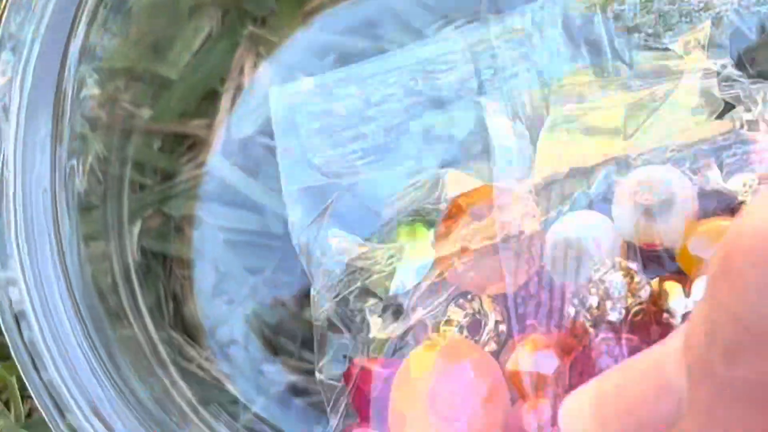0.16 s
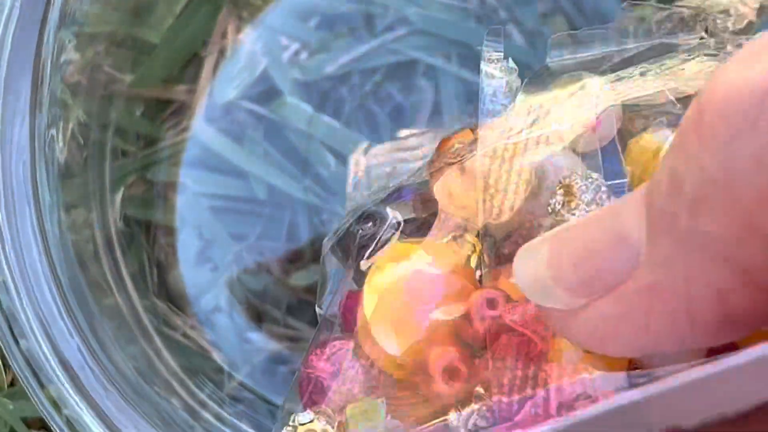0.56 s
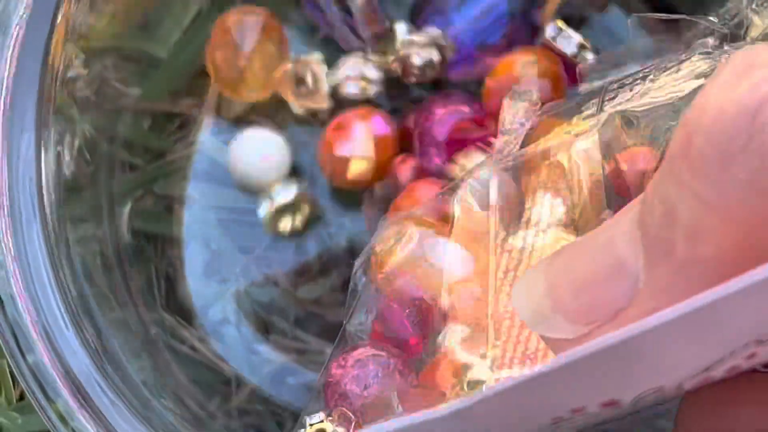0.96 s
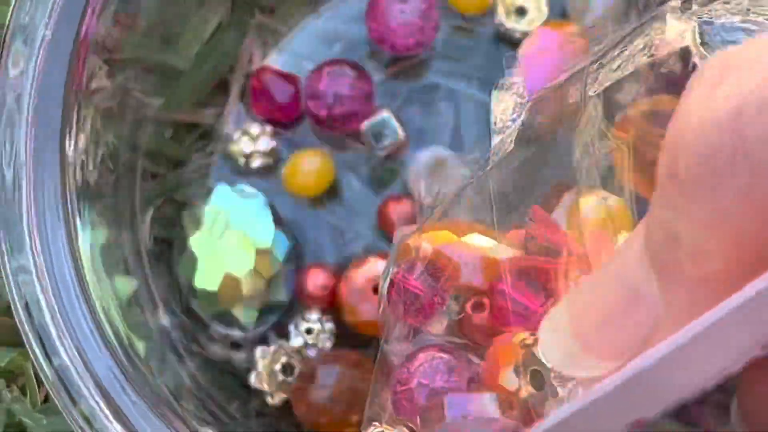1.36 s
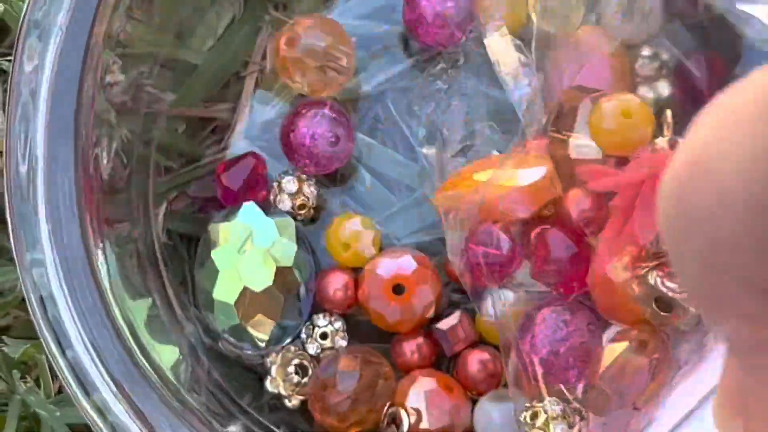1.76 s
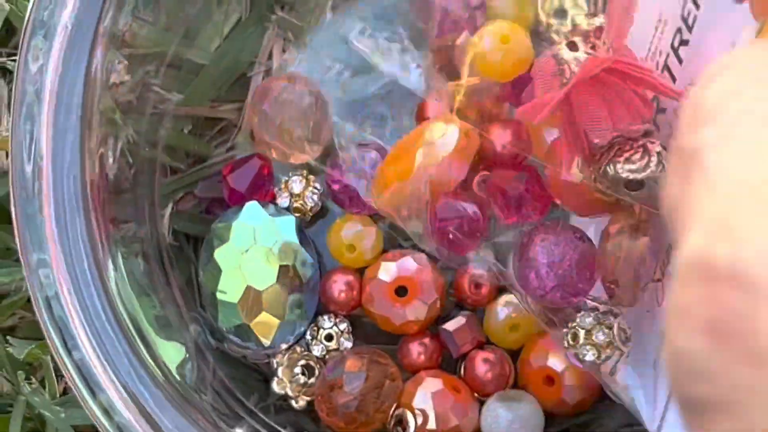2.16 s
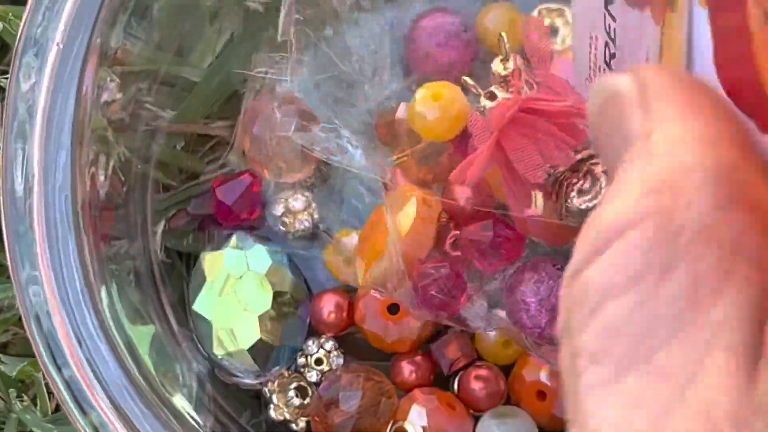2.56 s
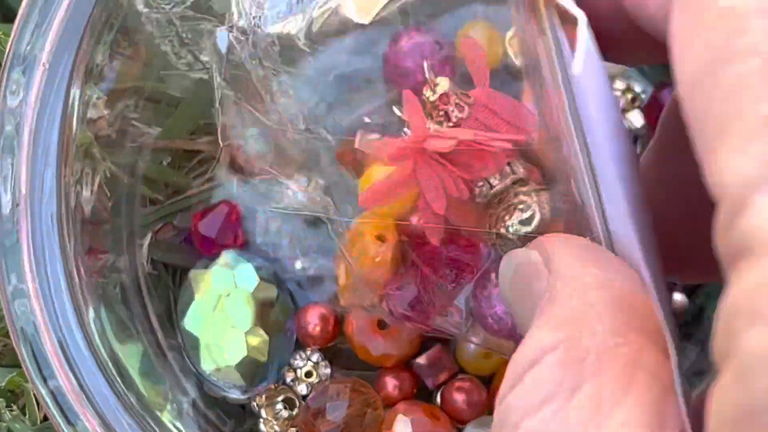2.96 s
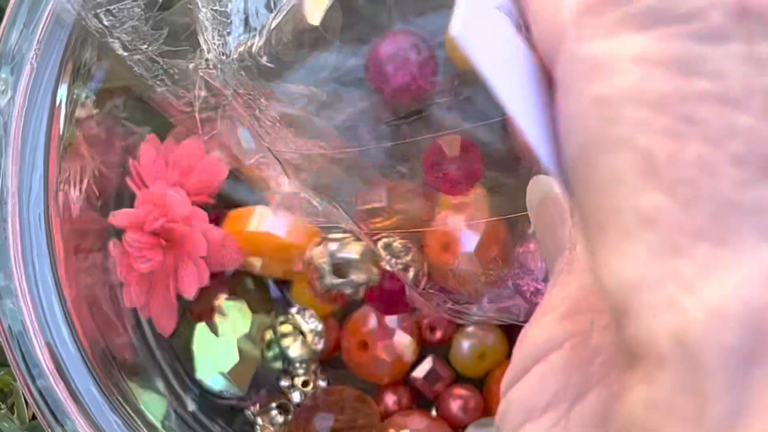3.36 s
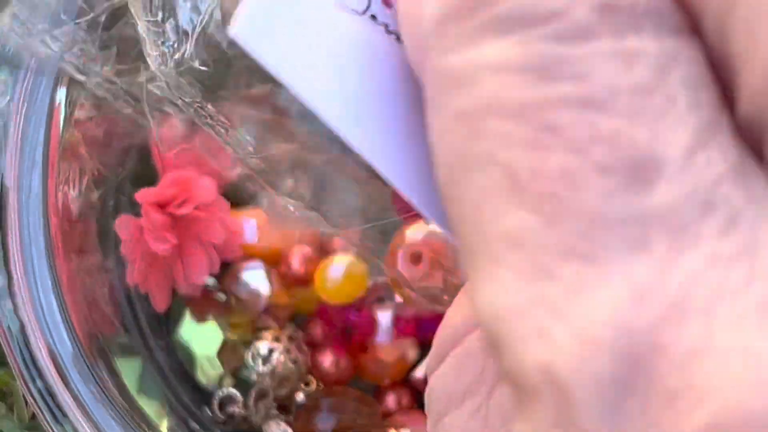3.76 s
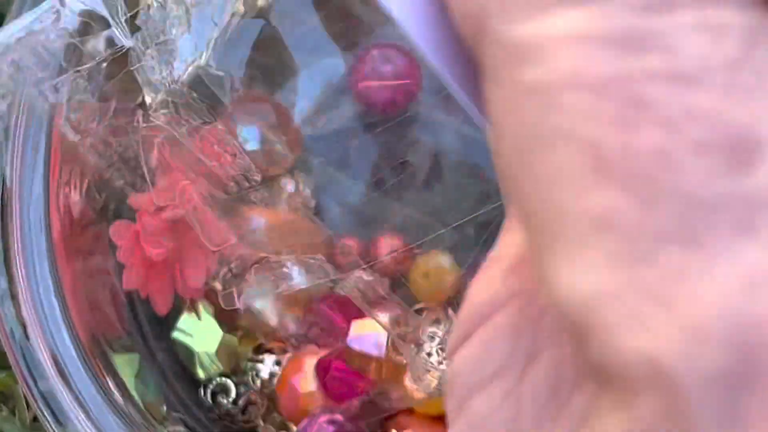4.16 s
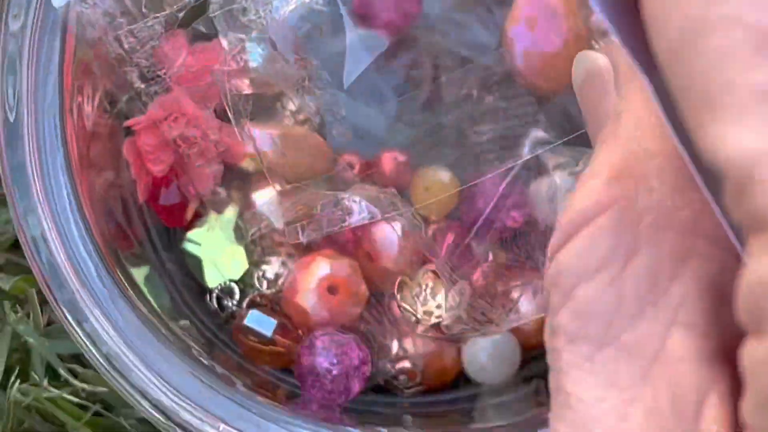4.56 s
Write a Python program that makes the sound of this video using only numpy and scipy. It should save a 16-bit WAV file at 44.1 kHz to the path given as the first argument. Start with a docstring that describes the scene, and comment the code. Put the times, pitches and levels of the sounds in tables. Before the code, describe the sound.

Small glass and metal beads spill from a crinkling plastic bag into a clear bowl, clattering and jingling brightly, then thinning to sparse ticks and a second smaller tumble.

```python
"""Beads poured from a bag into a bowl

Glass and metal beads slide out of a plastic bag into a bowl standing on grass.
Small metal beads and a larger metal ring chime as decaying modes; knocks on the bowl and snaps of the bag
excite broad resonances; random small contacts rustle and jingle; distant traffic rumbles as shaped noise.
Two microphone ports a little apart hear everything in shifted phase."""
import sys
import numpy as np
from scipy import signal
from scipy.fft import rfft, irfft, next_fast_len
from scipy.io import wavfile

SR = 44100
rng = np.random.default_rng(int(sys.argv[2]) if len(sys.argv) > 2 else 0)


def wav_out(sig):
    """Save sig, one row per channel (or a flat mono array), as 16-bit PCM at SR to the path in sys.argv[1]."""
    wavfile.write(sys.argv[1], SR, np.round(np.clip(np.atleast_2d(sig).T, -1, 1) * 32767).astype(np.int16))


def how_loud(loudness_db):
    """Turn decibels into a plain amplitude multiplier (0 dB gives 1, 20 dB gives 10)."""
    steps = np.asarray(loudness_db, float) / 20
    return 10 ** steps


N = 208433  # samples

# Far rumble and hiss, relative spectrum: frequency_hz, level_db (per hertz)
AIR_SPECTRUM = [(15, -34.5), (31, -17.5), (55, 0), (120, -4.5), (150, -12), (235, -12.5), (310, -21.5),
                (750, -32.5), (2050, -34), (3100, -44.5), (5700, -40), (7400, -49.5), (9000, -72.5),
                (12500, -57.5), (16000, -73)]
# Likeness of the air noise at the two ports: frequency_hz, likeness (0 to 1)
AIR_LIKENESS = [(40, .997), (100, .99), (300, .85), (700, .45), (1300, .1), (2200, .92), (4000, .99),
                (7000, .75), (16000, .9)]
# Phase by which the left port leads: frequency_hz, lead_rad
PORT_PHASE = [(0, 0), (300, 0), (450, .2), (1100, .15), (1300, .8), (1400, 2.6), (1520, 3.1), (1650, 3.6),
              (1740, 6.28), (4200, 6.28), (4400, 6.1), (5170, 6.05), (5600, 5.3), (6720, 5.5), (7670, 3.6),
              (8870, 2.9), (10700, .6), (12600, -.2), (14000, -1.8), (14700, -3.1), (17000, -3.1)]
# Level of the left port over the right: frequency_hz, difference_db
PORT_BALANCE = [(180, 0), (450, 3), (1050, 4), (1380, 10), (1550, 0), (1720, -2.6), (2050, -.5),
                (2350, -1.5), (2700, 0)]
# Range in which the echo is filtered out, so that both ports hear nearly the same sound: from_hz, to_hz
ALIKE_HZ = [2600, 5000]

# Stirring of bag and beads, as the level of the dull rustle: time_s, level_db
STIR = [(.04,-76),(.088,-47.5),(.2,-88.5),(.34,-53),(.44,-66.5),(.62,-53),(.82,-38),(.95,-28.5),(1.43,-40),(1.62,-51),(1.94,-52),(2.06,-68),(2.23,-48.5),(2.37,-73),(2.62,-56),(2.7,-64.5),(2.85,-49),(2.95,-58),(3.12,-49),(3.15,-47),(3.3,-45),(3.5,-44),(3.54,-45),(3.57,-56),(3.62,-57),(3.77,-51.5),(3.84,-57.5),(3.96,-41.5),(4.17,-43),(4.22,-40),(4.32,-52),(4.45,-61),(4.72,-103)]
# Level of the small beads jingling loose in the bowl: time_s, level_db
JINGLE = [(.72,-95),(.78,-68),(.89,-25.5),(1.03,-22),(1.1,-15.5),(1.43,-24),(1.49,-32),(1.76,-36.5),(1.9,-51.5),(2.03,-86),(3.15,-68),(3.3,-39),(3.45,-36.5),(3.6,-75),(3.77,-38.5),(3.96,-74),(4.09,-68),(4.18,-74),(4.27,-36.5),(4.45,-95)]
# Spans in which the ring lies loose among the beads: start_s, end_s
RING_LOOSE = [(.845, 1.45), (3.36, 3.9), (4.075, 4.1)]
# Resonances of the bowl: centre_hz, width_hz, level_db
BOWL_RESONANCES = [(593, 740, -15), (1206, 303, 3), (1613, 257, 0), (2020, 660, -7), (2420, 1400, -30)]
# Resonances of the bright rustle: centre_hz, width_hz, level_db
RUSTLE_RESONANCES = [(4730, 2100, 1.5), (6200, 3300, 1), (7800, 1400, 2), (11800, 6000, -10),
                     (14800, 1300, -6.5)]

# Snaps of the creasing bag: start_s (the snap sounds about 1 ms later), level_db,
# brightness_db (added to all resonances but the lowest)
SNAPS = [(0.075, -40.5, 1), (0.08, -43.5, 2), (0.095, -35, -1), (0.1153, -29.5, -7), (0.2715, -30.5, -6.5),
         (0.291, -37, -22), (0.313, -40, -2), (0.334, -45.5, 1), (0.539, -42.5, 0), (0.683, -30, -6),
         (0.7134, -33, 5), (0.7461, -31.5, -5), (0.8123, -35.5, -20.5), (0.966, -27.5, -11.5),
         (0.9765, -25, -14), (1.3415, -22.5, -2), (1.393, -42, -6), (1.425, -22.5, -4), (1.4363, -19.5, 2),
         (1.9326, -31.5, -6), (2.1747, -48.5, 15.5), (2.2366, -30, -10), (2.2493, -34, -1),
         (2.7711, -37, -13), (2.792, -24, -23), (2.8005, -33.5, -15), (2.82, -25, -5.5), (2.837, -21.5, 2),
         (3.0036, -33.5, 5), (3.0222, -30.5, 2), (3.056, -31.5, 2), (3.078, -38, 2.5), (3.136, -36, 0),
         (3.142, -35, 2), (3.144, -24, -3), (3.1549, -35, -1.5), (3.166, -29, -9), (3.2245, -27.5, -4),
         (3.247, -37, 7), (3.378, -34.5, 1.5), (3.394, -34.5, -0.5), (3.443, -24.5, -11.5),
         (3.4521, -24, -11), (3.486, -32.5, -3.5), (3.518, -42, -2), (3.534, -33, 5), (3.914, -50.5, -2),
         (3.9887, -27, -12)]
# Resonances of a snap: centre_hz, width_hz, level_db
SNAP_RESONANCES = [(1730, 610, 16), (3720, 920, 4.5), (4870, 1300, 11), (6200, 4100, -22)]

# Knocks on the bowl: start_s, thud_db, crack_db (both relative to a common gain for each part)
KNOCKS = [(0.1156, -27, -50), (0.482, -50, -35), (0.6186, -34, -40.5), (0.6864, -35, -34.5),
          (0.7471, -21, -27), (0.768, -34, -37), (0.7863, -7, -14.5), (0.805, -37, -29), (0.8276, -15, -43),
          (0.8463, -34, -15), (0.8534, -31, -14), (0.875, -3, -10), (0.895, -1.5, -12), (0.9216, -2, -19.5),
          (0.9257, -7, -20), (0.9567, -15, -29), (0.9695, -10, -10), (0.9791, -15, -20.5), (0.991, -9, -18),
          (1.0063, -16, -19.5), (1.0147, -7, -18.5), (1.0218, -19, -22), (1.0337, -16, -17),
          (1.0393, -15, -19), (1.0666, -34, -21), (1.0883, -10.5, -26), (1.099, -8, -18.5),
          (1.1105, -14.5, -23), (1.1215, -10.5, -33.5), (1.1332, -27.5, -20.5), (1.1449, -29, -20),
          (1.1531, -15.5, -27), (1.1611, -19, -18.5), (1.1709, -19, -29), (1.1795, -17, -22),
          (1.196, -20, -21), (1.1994, -19, -18), (1.207, -18, -27.5), (1.2174, -12, -27.5),
          (1.2307, -19, -22), (1.2345, -20, -15.5), (1.2504, -17, -25), (1.2686, -18, -22.5),
          (1.2721, -17.5, -20), (1.2962, -15.5, -17.5), (1.3047, -14, -24), (1.3154, -16, -24),
          (1.3288, -17.5, -17.5), (1.348, -14.5, -26), (1.3677, -14, -18), (1.4084, -20, -26.5),
          (1.4247, -6, -31), (1.467, -22.5, -41.5), (1.5303, -20, -25), (1.537, -15.5, -19),
          (1.5462, -24.5, -28.5), (1.5519, -11, -30), (1.5611, -29, -21.5), (1.5962, -16, -31),
          (1.625, -35, -38), (1.6318, -23, -27.5), (1.6468, -18.5, -27.5), (1.6634, -17.5, -29),
          (1.687, -26, -34.5), (1.6977, -17, -24.5), (1.7231, -21.5, -26), (1.7408, -23, -29),
          (1.7517, -30, -43.5), (1.7612, -28, -45), (1.771, -35, -45), (1.7784, -42, -55),
          (1.8509, -34, -31.5), (1.8559, -36, -47), (1.925, -21, -37.5), (1.9855, -29, -39),
          (1.9908, -32.5, -36), (2.0032, -27, -40), (2.1478, -34.5, -59), (2.171, -20, -32),
          (2.2136, -28, -51), (2.2573, -31, -38), (2.556, -45, -37.5), (2.5626, -40, -31),
          (2.6284, -38, -37.5), (2.6337, -37, -41.5), (2.711, -46, -38), (2.7263, -27.5, -49),
          (2.8537, -22.5, -37.5), (2.9373, -41, -63), (3.0171, -12, -31), (3.0262, -19, -46),
          (3.0579, -21, -40), (3.083, -20, -31), (3.099, -36, -44), (3.1424, -30, -20.5),
          (3.1585, -16, -39), (3.1697, -26, -29), (3.2009, -35, -44), (3.2546, -44, -28),
          (3.3043, -33.5, -27.5), (3.3254, -37.5, -26.5), (3.3419, -32, -24.5), (3.348, -26, -19.5),
          (3.3568, -34, -26), (3.3724, -30, -26.5), (3.3784, -34.5, -23.5), (3.4264, -33.5, -29.5),
          (3.4358, -26, -14), (3.4473, -29, -22), (3.454, -37.5, -19.5), (3.4613, -42, -20),
          (3.475, -43, -22.5), (3.4859, -18, -19.5), (3.4997, -36.5, -20.5), (3.5402, -33, -23.5),
          (3.5464, -38, -36), (3.6218, -48.5, -34.5), (3.643, -39, -41), (3.671, -41.5, -30.5),
          (3.6778, -40, -31), (3.7107, -44, -37.5), (3.7487, -41.5, -35), (3.7618, -29, -23),
          (3.7711, -23.5, -24.5), (3.778, -34, -31), (3.7875, -35, -28), (3.8219, -36.5, -33.5),
          (3.8284, -35, -32.5), (3.8482, -31, -34.5), (3.8673, -28, -25.5), (3.8996, -42, -29.5),
          (3.931, -41, -29.5), (3.9645, -26.5, -27), (3.975, -30.5, -36.5), (4.0192, -15.5, -25.5),
          (4.0752, -17, -9.5), (4.0838, -30, -27), (4.0922, -25.5, -40), (4.1246, -19.5, -37),
          (4.1408, -25, -25), (4.1536, -18.5, -20.5), (4.1838, -28, -19), (4.2098, -27, -31),
          (4.222, -41, -30.5), (4.2307, -33, -24), (4.263, -43, -27), (4.272, -45, -23.5),
          (4.3354, -24, -18.5), (4.3764, -32, -38.5), (4.475, -37.5, -36.5), (4.578, -51, -49),
          (4.589, -53, -48), (4.688, -31.5, -63)]
# Resonances of a crack: centre_hz, width_hz, level_db
CRACK_RESONANCES = [(4990, 1430, 1.5), (5670, 3340, 2), (8870, 3100, -0.5), (11500, 2400, -1),
                    (16000, 13000, -4.5)]

# Blows on the larger ring: start_s, level_db
RING_BLOWS = [(0.8468,-12),(0.939,-20),(0.9995,-22.5),(1.056,-17),(1.067,-23),(1.081,-25),(1.099,-22),(1.122,-26),(1.194,-28),(1.24,-30),(1.2685,-32),(1.3217,-29.5),(1.345,-44),(1.3657,-26),(1.409,-36),(1.55,-33),(1.579,-36),(4.074,-8),(4.102,-15.5),(4.1395,-30),(4.1852,-12),(4.22,-16.5),(4.241,-24),(4.2582,-23.5),(4.268,-22.5),(4.282,-24),(4.339,-19),(4.35,-19.5),(4.3811,-26),(4.413,-35.5)]
# Frequencies of the ring modes: pitch_hz
RING_HZ = [5613, 2375, 9951, 15615, 15735]
# Ring modes: struck_db, t60_s (undamped), loss (dB per dB that a blow is softer than a hard one), jingle_db
RING_MODES = [(3, 0.059, 0, 3), (-14.5, 0.12, 2, -6.5), (-6.5, 0.056, 0.95, -12), (-6.5, 0.03, 4.5, -2),
              (-10.5, 0.03, 1, -1)]

# Blows on the small metal beads: start_s, lowest_mode_db, upper_modes_db
BEAD_BLOWS = [(.786,-9.5,-18.5),(.8271,-14,-18),(0.876,-7.5,-22),(.895,-11.5,-13.5),(0.9063,-13,-20),(.9217,-14,-21),(.966,-18.5,-21),(.9815,-4,-25),(1.0148,-14.5,-28),(1.0335,-23.5,-17.5),(1.053,-17,-22),(1.073,-16.5,-23),(1.1,-22,-17),(1.1075,-22,-14),(1.1432,-24,-22),(1.166,-17,-21),(1.1775,-18,-22.5),(1.1935,-17.5,-27.5),(1.219,-19,-25),(1.2296,-17.5,-25.5),(1.2426,-14.5,-23.5),(1.2541,-16.5,-17.5),(1.2797,-22,-22),(1.2997,-39,-21.5),(1.3566,-47.5,-19.5),(1.4653,-22,-33),(1.521,-22,-20.5),(1.5302,-16.5,-24),(1.5366,-17.5,-16.5),(1.5518,-11.5,-30),(1.5975,-13.5,-23.5),(1.6466,-15.5,-24.5),(1.6638,-16.5,-30.5),(1.697,-17,-21.5),(1.723,-24.5,-25),(1.7407,-21,-26.5),(1.7757,-31,-42),(1.8017,-31,-48),(1.8132,-32,-44),(1.824,-29.5,-46),(1.8492,-33,-47),(1.8715,-30,-49),(1.9263,-36,-65),(1.9693,-45,-55),(1.988,-29,-40),(2.055,-43.5,-56),(2.121,-43,-55.5),(2.162,-41.5,-58.5),(2.627,-40.5,-46.5),(2.7107,-40.5,-49.5),(2.893,-48,-60),(2.968,-47.5,-60),(3.2706,-28.5,-43.5),(3.298,-28,-37),(3.325,-25,-30),(3.3833,-43,-43),(3.4284,-22.5,-33),(3.4474,-25,-34),(3.4842,-16,-19),(3.621,-43,-44),(3.641,-33.5,-41.5),(3.671,-32.5,-37),(3.7108,-34,-51),(3.7706,-31.5,-40),(3.7868,-22.5,-29.5),(3.8219,-26.5,-29.5),(3.8662,-28.5,-34.5),(3.8997,-30.5,-41),(3.9307,-28.5,-43.5),(3.9517,-30,-49),(3.9818,-28.5,-34),(4.0736,-33,-28),(4.1857,-27,-32),(4.2203,-39,-42),(4.336,-34,-52)]
# Frequencies of the bead modes at pitch ratio 1: pitch_hz
BEAD_HZ = [9275, 13080, 13828]
# Bead modes: struck_db, t60_s (before neighbours damp a struck bead), jingle_db
BEAD_MODES = [(5, .068, 0), (2, .055, -7), (2, .05, -6)]
# The beads that fall later are a little smaller: time_s, pitch_ratio (of the lowest mode)
BEAD_SIZE = [(1.2, 1.0), (1.6, 1.004), (4.0, 1.006)]
# Lead of the third bead mode over the second, changing with the beads that fall: time_s, lead_db
THIRD_LEAD = [(1.2, -1.0), (1.85, 1.5), (2.0, 9), (2.7, -7), (3.2, 8.5)]


def rms_one(x):
    """Normalization: scales a signal to unit rms."""
    return x / np.sqrt(np.mean(x ** 2) + 1e-20)


def at_hz(points, hz):
    """Interpolation along a logarithmic frequency axis."""
    p = np.array(points)
    return np.interp(np.log(hz + 1), np.log(p[:, 0] + 1), p[:, 1])


def in_time(curve):
    """Linear interpolation of a control curve at every sample."""
    return np.interp(np.arange(N) / SR, *np.transpose(curve))


def drift(rate_hz):
    """Low-pass filtered noise: a slow random wander of unit rms."""
    r = np.exp(-2 * np.pi * rate_hz / SR)
    wander = signal.lfilter([1], [1, -2 * r, r * r], rng.standard_normal(N + SR))
    return rms_one(wander[SR:])


def clicks_at(times_s, sizes):
    """Impulse excitation: places one-sample clicks at the given times."""
    out = np.full(N, 1e-18)
    samples = np.round(np.asarray(times_s) * SR).astype(int)
    np.add.at(out, np.clip(samples, 0, N - 1), sizes)
    return out


def ring(clicks, hz, t60_s):
    """Damped oscillator: a unit click sets a decaying sine of height 1 ringing."""
    r = how_loud(-60 / (t60_s * SR))
    w = 2 * np.pi * hz / SR
    return signal.lfilter([0, np.sin(w)], [1, -2 * r * np.cos(w), r * r], clicks)


def resonate(x, peaks):
    """Parallel resonance: broad band-passes summed with alternating signs."""
    out = 0
    for k, (hz, width_hz, db) in enumerate(peaks):
        r = np.exp(-np.pi * width_hz / SR)
        zeros = [(1 - r * r) / 2, 0, (r * r - 1) / 2]
        poles = [1, -2 * r * np.cos(2 * np.pi * hz / SR), r * r]
        out = out + (-1) ** k * how_loud(db) * signal.lfilter(zeros, poles, x)
    return out


def grains(per_s, spread_db):
    """Clustered random impacts: clicks of uneven size whose rate wanders, so that they come in clumps."""
    born = rng.random(N) < per_s * how_loud(5.0 * drift(14)) / SR
    largest = 3.5  # in spreads
    size = how_loud(spread_db * np.minimum(rng.exponential(1, N), largest))
    return born * size * rng.choice([-1, 1], N) + 1e-18


def burst(clicks, decay_s):
    """Exponential decay of noise: each click becomes a short dying puff."""
    envelope = signal.lfilter([1], [1, -np.exp(-1 / (decay_s * SR))], clicks)
    return envelope * rng.standard_normal(N)


def open_air():
    """Partial coherence: far rumble and faint hiss mix shared and opposed noise at the two ports."""
    hz = np.arange(N // 2 + 1) * SR / N
    shared, apart = rfft(rng.standard_normal((2, N))) * how_loud(at_hz(AIR_SPECTRUM, hz))
    alike = np.clip(at_hz(AIR_LIKENESS, hz), 0, 1)
    common = np.sqrt(1 + alike) * shared
    opposed = np.sqrt(1 - alike) * apart
    pair = np.array([irfft(common + opposed, N), irfft(common - opposed, N)])
    return how_loud(-42.5 + 0.97 * drift(3.0)) * rms_one(pair)


def dull_rustle(taps):
    """Modal excitation: every small contact strikes the whole bowl but favours some resonances."""
    favoured = [resonate(taps * how_loud(3.5 * rng.standard_normal(N)), [peak]) for peak in BOWL_RESONANCES]
    return rms_one(sum(favoured))


def bright_rustle(taps):
    """Filtered shot noise: very short puffs at dense contacts excite high resonances."""
    contacts = grains(1300, spread_db=3.5) + taps
    return rms_one(resonate(burst(contacts, decay_s=0.0006), RUSTLE_RESONANCES))


def bead_jingle():
    """Random excitation of modes: light contacts ring beads of the first size and some smaller ones."""
    beads = sum(how_loud(db) * ring(grains(150, spread_db=3.0), hz, t60_s)
                for hz, (_, t60_s, db) in zip(BEAD_HZ, BEAD_MODES))
    smaller = ring(grains(98, spread_db=3.5), BEAD_HZ[0] * BEAD_SIZE[-1][1], BEAD_MODES[0][1])
    return rms_one(beads + 0.8 * smaller)


def ring_jingle():
    """Contact damping: neighbours shorten the ringing of the lightly tapped ring."""
    damping = .45  # factor on t60
    return rms_one(sum(how_loud(db) * ring(grains(300, spread_db=-1.5), hz, t60_s * damping)
                       for hz, (_, t60_s, _, db) in zip(RING_HZ, RING_MODES)))


def rustle():
    """Superposition of small contacts: dense ones between the blows feed bowl, bag and metal modes."""
    stir_db = in_time(STIR)
    above_db = stir_db + 45  # over a middle stir of -45 dB
    taps = grains(800, spread_db=4.0)
    dull = how_loud(stir_db) * dull_rustle(taps)
    bright = how_loud(-47.5 + 1.084 * above_db) * bright_rustle(taps)
    beads = how_loud(in_time(JINGLE)) * bead_jingle()
    sample = np.arange(N)
    loose = sum((sample > start_s * SR) & (sample < end_s * SR) for start_s, end_s in RING_LOOSE)
    buried_db = -20 * np.logical_not(loose)
    hoop = how_loud(-47 + .9 * above_db + buried_db) * ring_jingle()
    return dull + bright + beads + hoop


def snaps():
    """Buckling of a film: a click and a very short puff, each snap with its own balance of resonances."""
    delay_s = 0.00097  # constant wait before every snap
    start_s, level_db, bright_db = np.transpose(SNAPS)
    fold_db = 2 * rng.standard_normal((len(start_s), len(SNAP_RESONANCES)))
    out = 0
    for k, peak in enumerate(SNAP_RESONANCES):
        clicks = clicks_at(start_s + delay_s, how_loud(level_db + fold_db[:, k] + bright_db * (k > 0)))
        puffs = burst(clicks, decay_s=.002)
        out = out + resonate(how_loud(5) * clicks + how_loud(-6.5) * puffs, [peak])
    return out


def knocks():
    """Impact on a shell: the bowl wall thuds for a few cycles, coloured by the spot, under a bright crack."""
    start_s, thud_db, crack_db = np.transpose(KNOCKS)
    spot_db = 2.5 * rng.standard_normal((len(start_s), len(BOWL_RESONANCES)))
    thud = 0
    for k, peak in enumerate(BOWL_RESONANCES):
        blows = clicks_at(start_s, how_loud(thud_db + 19.0 + spot_db[:, k]))
        thud = thud + (-1) ** k * resonate(blows, [peak])
    thud = signal.lfilter(*signal.butter(2, 2600, fs=SR), thud)  # the contact is soft
    chatter = burst(clicks_at(start_s, how_loud(thud_db - 7.5)), decay_s=0.004)
    cracks = clicks_at(start_s, how_loud(crack_db + 9.5))
    crack = burst(cracks, decay_s=0.00059) + how_loud(-18) * burst(cracks, decay_s=0.004)
    return thud + resonate(chatter, BOWL_RESONANCES) + resonate(crack, CRACK_RESONANCES)


def metal_ring():
    """Bending modes: each blow starts them afresh and chokes what still rang from the one before."""
    hard_blow_db = -11.5
    out, t = np.zeros(N + SR), np.arange(SR // 4) / SR
    hz = np.array(RING_HZ)[:, None]
    mode_db, t60_s, loss, _ = np.transpose(RING_MODES)[:, :, None]
    phases = rng.random((len(RING_BLOWS), len(hz), 1))
    next_blows_s = [row[0] for row in RING_BLOWS[1:]] + [N / SR]
    for (start_s, blow_db), next_s, phase in zip(RING_BLOWS, next_blows_s, phases):
        struck_db = mode_db + blow_db + loss * min(blow_db - hard_blow_db, 0)
        choke_db = -9 * np.clip((t + start_s - next_s) / 0.0015, 0, 1)
        onset = 1 - np.exp(-t / 0.00086)
        fade = how_loud(struck_db - 60 * t / t60_s + choke_db) * onset
        swing = np.sin(2 * np.pi * (hz * t + phase))
        first = round(start_s * SR) - 30  # the gradual onset begins a little early
        out[first:][:len(t)] += np.sum(fade * swing, axis=0)
    return out[:N]


def small_beads():
    """Modal synthesis: each blow rings one bead, whose mode frequencies scale with its size."""
    out, t = np.zeros(N + SR), np.arange(SR // 5) / SR
    mode_db, t60_s, _ = np.transpose(BEAD_MODES)[:, :, None]
    onset = 1 - np.exp(-t / 0.0001)
    chance = rng.random((len(BEAD_BLOWS), 8))
    for (start_s, low_db, upper_db), c in zip(BEAD_BLOWS, chance):
        # where a bead is struck shifts second and third mode against each other
        lead_db = np.interp(start_s, *np.transpose(THIRD_LEAD)) + 9 * (c[7] - .5)
        struck_db = np.array([[low_db], [upper_db - lead_db / 2], [upper_db + lead_db / 2]])
        ratio = np.interp(start_s, *np.transpose(BEAD_SIZE)) + .003 * (c[6] - .5)
        hz = np.array(BEAD_HZ) * [ratio, np.sqrt(ratio), np.sqrt(ratio)]
        swing = np.sin(2 * np.pi * (hz[:, None] * t + c[:len(hz), None]))
        grip = 0.83 + 0.094 * c[5]  # neighbours damp each bead differently
        fade = how_loud(mode_db + struck_db - 60 * t / (t60_s * grip)) * onset
        out[round(start_s * SR):][:len(t)] += np.sum(fade * swing, axis=0)
    return out[:N]


def wall_echo(near):
    """Diffuse scattering: a very short noise response of the bowl wall, opposite in sign at the two ports."""
    t = np.arange(400) / SR
    scatter = rng.standard_normal(len(t)) * np.exp(-t / 0.002)
    band_stop = signal.butter(3, ALIKE_HZ, "bandstop", fs=SR, output="sos")
    scatter = signal.sosfilt(band_stop, scatter)
    scatter = scatter / np.sqrt(np.sum(scatter ** 2))
    return how_loud(-24) * signal.fftconvolve(near, scatter)[:N] * [[1], [-1]]


def ports(left, right):
    """Phase and level difference: the right port is shifted in phase and weaker around one kilohertz."""
    size = next_fast_len(N + 4096)
    hz = np.arange(size // 2 + 1) * SR / size
    phase = np.interp(hz, *np.transpose(PORT_PHASE))
    balance = how_loud(at_hz(PORT_BALANCE, hz))
    shifted = irfft(rfft(right, size) / balance * np.exp(-1j * phase), size)[:N]
    return np.array([left, shifted])


def scene():
    """Superposition: the near sources, their wall scatter and the open air reach both ports."""
    near = rustle() + snaps() + knocks() + metal_ring() + small_beads()
    left, right = near + wall_echo(near) + open_air()
    return ports(left, right)


def band_limit(x):
    """A steep low-pass at the top of the band."""
    return signal.sosfilt(signal.butter(12, 16970, fs=SR, output="sos"), x)


def record(dry):
    """Saturation and band limiting: peaks are rounded and the top is cut."""
    rounded = .95 * np.tanh(dry / .95)
    low_pass = signal.cheby2(20, 80, 17300, fs=SR, output="sos")
    mix = signal.sosfilt(low_pass, rounded)
    return band_limit(mix)


dry = scene()
out = record(dry)
wav_out(out)
```